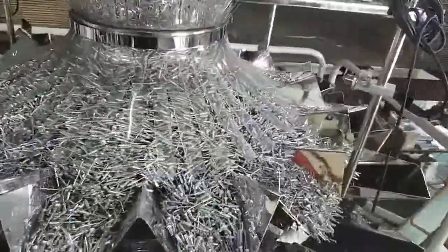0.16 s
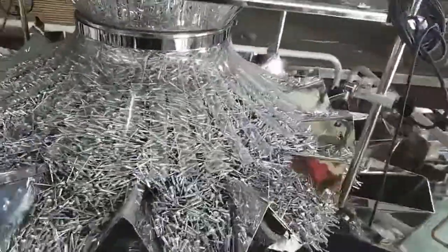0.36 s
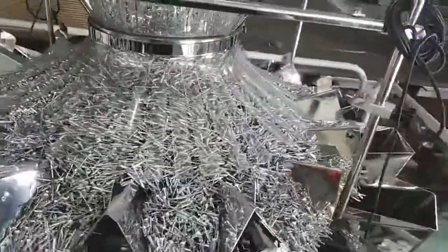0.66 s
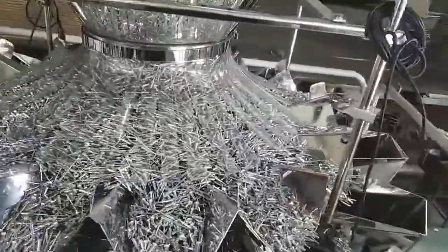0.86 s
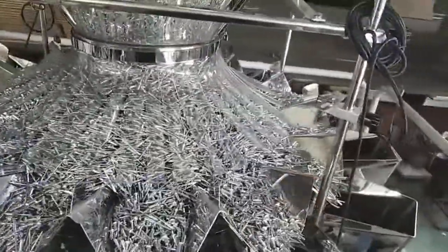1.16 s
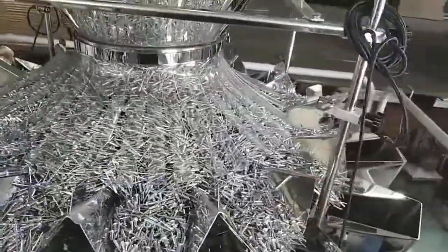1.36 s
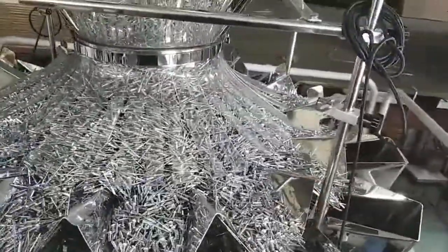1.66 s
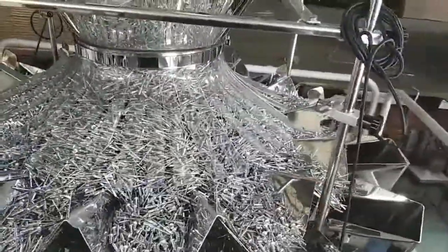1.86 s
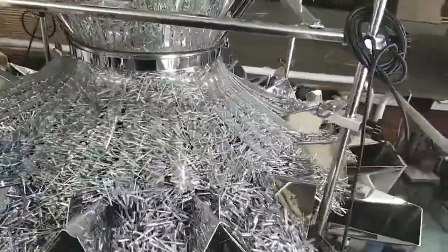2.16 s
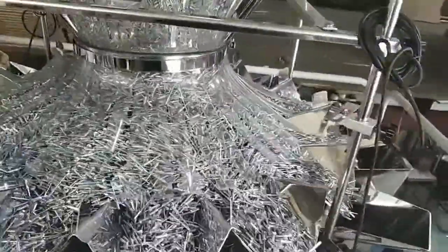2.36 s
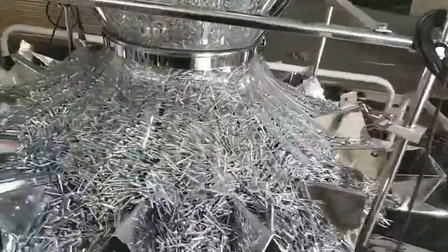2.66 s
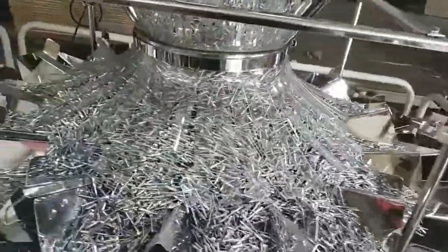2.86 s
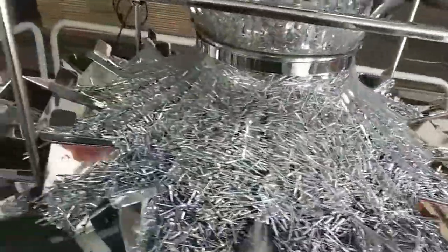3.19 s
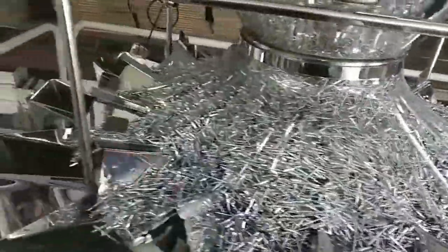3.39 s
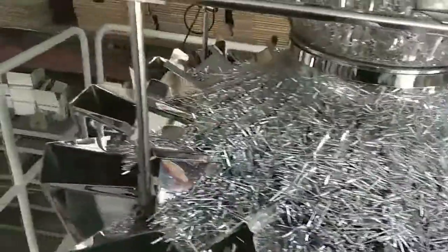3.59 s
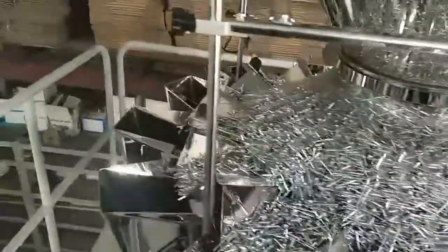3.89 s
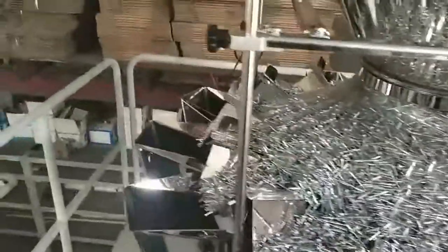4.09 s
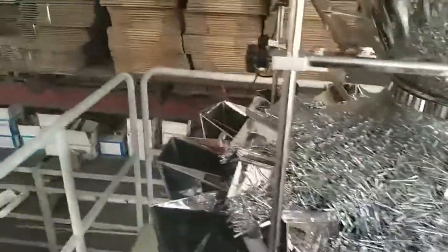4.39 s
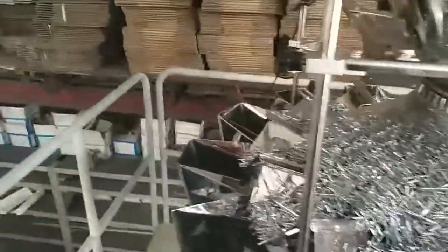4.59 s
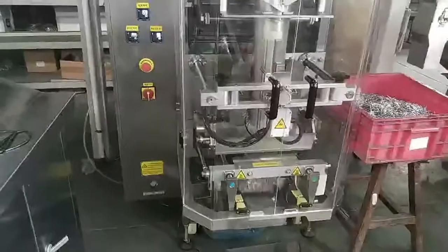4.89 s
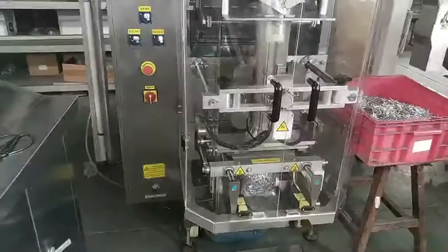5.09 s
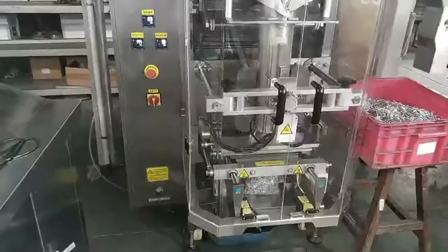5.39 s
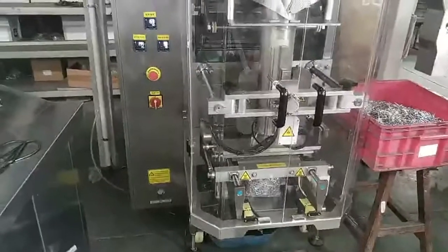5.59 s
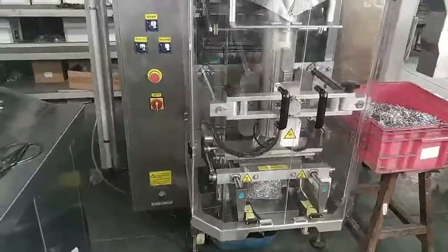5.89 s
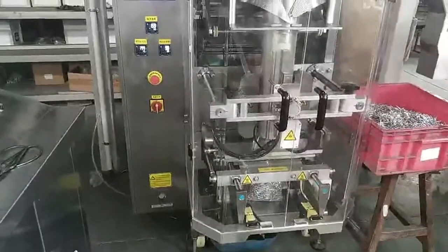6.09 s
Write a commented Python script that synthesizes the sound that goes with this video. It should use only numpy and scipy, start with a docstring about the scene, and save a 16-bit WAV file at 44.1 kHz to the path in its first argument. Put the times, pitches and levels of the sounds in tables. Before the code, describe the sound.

Countless small steel nails jingle and clatter down vibrating metal pans into buckets, with sharp pings and a pouring rush, then a brighter, steadier jingle.

```python
"""In a hall, steel nails shake down the vibrating pans of a weighing machine and drop into its buckets.
From the start, grains ringing at many pitches make the jingle, pan clatter and rumble; soon single nails
ring bucket modes, metal groans through narrow resonances and dry decaying tones tick. Then gate drives
hum in short strokes of resonant noise, and at 2.21 s a batch pours down the chute. From 4.65 s the
microphone stands below, beside the bagging unit, where the jingle and clatter have other colours."""
import sys
import numpy as np
from scipy import signal
from scipy.io import wavfile
from scipy.ndimage import uniform_filter1d

SR = 44100
rng = np.random.default_rng(int(sys.argv[2]) if len(sys.argv) > 2 else 0)


def store_wav(level_fs):
    """Save 16-bit WAV to argv[1]."""
    pcm = np.round(np.clip(np.atleast_2d(level_fs), -1, 1) * 32767)
    wavfile.write(sys.argv[1], SR, pcm.T.astype(np.int16))


N = 275625
MOVE_S = 4.65  # from here the microphone stands below, at the bagging unit
FRAME = 512  # samples in a short-time spectrum


def gain_of(db):
    """Decibels to amplitude."""
    return 10 ** (np.asarray(db) / 20)


def evened(x):
    """Scales to rms 1."""
    return x / np.sqrt(np.mean(abs(x) ** 2) + 1e-20)


def read(points, hz):
    """Reads a table along log frequency."""
    f, value = np.transpose(points)
    return np.interp(np.log(hz + 1), np.log(f + 1), value)


def add(mix, s, sound):
    """Mixes a sound in at s seconds, cut off at the end of the mix."""
    part = mix[round(s * SR):][:len(sound)]
    part += sound[:len(part)]


def resonate(x, hz, width):
    """A resonance of gain 1: shifts the curve hz down to zero, smooths, and shifts back."""
    turn = np.exp(2j * np.pi * np.cumsum(hz * np.ones(len(x))) / SR)
    r = np.exp(-np.pi * width / SR)
    return 2 * (turn * signal.lfilter([1 - r], [1, -r], x / turn)).real


def frames_of(x):
    """Short-time spectrum: frequencies, times, values."""
    return signal.stft(x, SR, nperseg=FRAME, noverlap=FRAME * 3 // 4)


def sound_of(z):
    """Back from the short-time spectrum."""
    return signal.istft(z, SR, nperseg=FRAME, noverlap=FRAME * 3 // 4)[1][..., :N]


def patches(shape, bins, frames):
    """Smooth random field over frequency and time, rms 1."""
    field = rng.standard_normal(shape[::-1]).T
    return evened(uniform_filter1d(uniform_filter1d(field, bins, 0), frames, 1))


def pings(lo_hz, hi_hz, per_s, shortest_t60_s, spread_db, tick, count):
    """Many small blows; each ticks and rings one of count pitches, renewed as the pieces move on."""
    struck = rng.random(N) < per_s / SR
    size = gain_of(spread_db * np.minimum(rng.exponential(1, N), 3.6)) * struck
    size *= rng.choice([-1., 1.], N)
    which, ring = rng.integers(0, count, N), np.zeros(N)
    span = SR // 2  # the pitches are redrawn every half second
    for start in range(0, N, span):
        piece = slice(start, start + span)
        for k, (pitch, longer) in enumerate(rng.random((count, 2))):
            step = 2 * np.pi * (lo_hz + (hi_hz - lo_hz) * (k + pitch) / count) / SR
            t60_s = shortest_t60_s * (1 + 0.65934 * longer)
            r = np.exp(-np.log(1000) / (t60_s * SR))
            blows = np.pad(size[piece] * (which[piece] == k), (0, SR // 10))
            resonator = [np.sin(step) * np.sqrt(1 - r)], [1, -2 * r * np.cos(step), r * r]
            add(ring, start / SR, signal.lfilter(*resonator, blows))
    return evened(evened(ring) + tick * evened(size))


def layer(grains, grain_share, colours, level_db, patchy_db):
    """Near grains over the blur of far ones, coloured before and after the move, at the flow's level."""
    blur = rng.standard_normal(N)
    hz, t, z = frames_of(np.sqrt(grain_share) * grains + np.sqrt(1 - grain_share) * blur)
    above, below = (evened(gain_of(read(c, hz)))[:, None] for c in colours)
    z = z * gain_of(patchy_db * patches(z.shape, bins=6, frames=14))
    sound = sound_of(np.where(t < MOVE_S, above, below) * z)
    moved = np.arange(N) >= MOVE_S * SR
    rms = np.where(moved, sound[moved].std(), sound[~moved].std())
    return sound / rms * gain_of(level_db)


# slow levels, over the pans and then at the bagging unit:
# [t/s, pan clatter level/dB, nail jingle level/dB, rumble level/dB]
FLOW_LEVELS = [(0, -28.5, -22.5, -42.5), (.3, -22, -28, -29), (.8, -23, -21.5, -33.5),
               (1.2, -23, -22.5, -34), (1.6, -20.5, -20.5, -31), (2.1, -24.5, -23.5, -36.5),
               (2.5, -25.5, -20, -39), (3.0, -24, -22.5, -37), (3.17, -25.5, -28.5, -35),
               (3.55, -22.5, -22, -35.5), (3.9, -22, -23, -33.5), (4.1, -22, -22.5, -31.5),
               (4.645, -21.5, -21, -35), (4.655, -25, -19.5, -33), (4.85, -27.5, -16.5, -32.5),
               (5.05, -22, -15.5, -33.5), (5.3, -27, -17, -35), (5.6, -25.5, -18, -36.5),
               (6.25, -24, -19, -37.5)]
# bunches of nails slide off a pan:
# [middle t/s, length/s, rise of pan clatter level/dB, of nail jingle level/dB, of rumble level/dB]
PAN_SURGES = [(0.012, 0.023, 3, 5, 4), (0.135, 0.051, 1.5, 8.5, 1.5), (0.259, 0.061, -1.5, 9, 0.5),
              (0.34, 0.094, -2.5, 6, -5), (0.447, 0.098, 4, 3.5, 2.5), (0.568, 0.088, 1.5, 5.5, -2),
              (1.318, 0.065, 5.5, 1, 5), (1.456, 0.09, -4, 5.5, 1.5), (1.475, 0.056, 7, 0, 1.5),
              (1.817, 0.11, 5, 5.5, 3), (1.96, 0.1, 2.5, 4.5, 2), (2.032, 0.073, 3.5, 1, 7),
              (2.27, 0.36, 4.5, 5, 3), (2.813, 0.053, 2.5, 2.5, 3.5), (3.066, 0.086, -0.5, 5, -5.5),
              (3.271, 0.086, 3, 6, 2.5), (4.04, 0.081, 4.5, 1.5, 2.5), (4.174, 0.074, 2, 7.5, 2),
              (4.401, 0.057, 2.5, 3.5, 8.5), (4.528, 0.081, 1, 4.5, 3), (4.946, 0.024, 1, 1, 6),
              (5.16, 0.19, -1.5, -4, 2.5), (5.872, 0.13, -1, 2, 3), (6.183, 0.13, -3, 3.5, 4)]
# the level dips suddenly and creeps back: [lowest t/s, depth of level/dB, recovery/s]
LEVEL_DIPS = [(.15, 7.5, 0.047), (.6, 5, 0.15), (1.835, 4, 0.079), (2.854, 7.5, 0.021),
              (2.935, 5.5, 0.023), (3.288, 7.5, 0.17), (3.645, 5, 0.16), (4.575, 4.5, 0.055)]
DROP_S = 0.012


def levels_db(t):
    """Slow levels of the three layers, changed by each surge and lowered together by each dip."""
    s, *slow = np.transpose(FLOW_LEVELS)
    out = np.array([np.interp(t, s, level) for level in slow])
    for middle, length, *rise_db in PAN_SURGES:
        out = out + np.outer(rise_db, np.exp(-(2 * (t - middle) / length) ** 2))
    for s, depth_db, recovery in LEVEL_DIPS:
        out = out - np.interp(t, [s - DROP_S, s, s + recovery], [0, depth_db, 0])
    return out


# pan clatter heard over the pans, then from below: [f/Hz, relative level/dB per Hz]
PAN_COLOUR_ABOVE = [(1000, -43), (1900, -10.5), (2400, -2), (3000, -0.5), (3900, -3), (5200, -5),
                    (7000, -24)]
PAN_COLOUR_BELOW = [(1000, -22), (1900, -8), (2800, -2.5), (3500, -1.5), (4700, -2), (6500, -26)]


def pan_clatter(level_db):
    """Sheet-metal pans ring in the middle of the range under many small blows."""
    pans = pings(1506.7, 6000, per_s=1200, shortest_t60_s=0.0637, spread_db=3.0, tick=0.99, count=40)
    return layer(pans, 0.32, (PAN_COLOUR_ABOVE, PAN_COLOUR_BELOW), level_db, patchy_db=0.36)


# nail jingle heard over the pans, then from below: [f/Hz, relative level/dB per Hz]
NAIL_COLOUR_ABOVE = [(3500, -32), (5200, -17), (6000, -9.5), (6900, -7.5), (7800, -3.5), (9000, -4.5),
                     (9900, -10.5), (10300, -17), (11000, -43)]
NAIL_COLOUR_BELOW = [(4600, -22), (5300, -4.5), (5850, -1), (7200, -3.5), (8000, 0.5), (8900, 0),
                     (9900, -7), (10300, -19), (11000, -37)]


def nail_jingle(level_db):
    """Small steel nails knock together and ring in the treble."""
    nails = pings(4000, 11000, per_s=1600, shortest_t60_s=0.06188, spread_db=4.0, tick=0.87, count=50)
    return layer(nails, 0.41, (NAIL_COLOUR_ABOVE, NAIL_COLOUR_BELOW), level_db, patchy_db=0.83)


# slow change of the rumble's bass: [t/s, change of level/dB]
BASS_SWELL = [(0, 4.5), (.95, 6), (1.4, 0.5), (1.8, -22), (2.55, -9), (2.9, 5), (3.9, 8.5), (4.25, -2),
              (4.6, -8), (5.2, 6.5), (6.25, -2)]
BASS_HZ = 215  # the bass lies below this corner


def swell_bass(x):
    """The lowest part of the rumble comes and goes slowly."""
    low = signal.sosfiltfilt(signal.butter(3, BASS_HZ, fs=SR, output="sos"), x)
    change_db = np.interp(np.arange(N) / SR, *np.transpose(BASS_SWELL))
    return x + low * (gain_of(change_db) - 1)


# rumble, the same at both places: [f/Hz, relative level/dB per Hz]
RUMBLE_COLOUR = [(30, -40), (125, -50), (175, -8), (290, -8), (400, -7), (650, -12), (1040, -7.5),
                 (1600, -9.5), (2300, -15), (3500, -53)]


def frame_rumble(level_db):
    """The frame's low pings, mostly blurred into a rumble, with a bass that swells."""
    frame = pings(107.3, 2600, per_s=500, shortest_t60_s=0.09282, spread_db=0.5, tick=0.14, count=20)
    return swell_bass(layer(frame, 0.12, (RUMBLE_COLOUR, RUMBLE_COLOUR), level_db, patchy_db=0.3))


def flow():
    """Clatter of pans, jingle of nails and rumble of the frame rise and fall with the flow."""
    coarse_db = levels_db(np.arange(0, N, 25) / SR)
    clatter_db, jingle_db, rumble_db = np.repeat(coarse_db, 25, axis=1)
    return pan_clatter(clatter_db) + nail_jingle(jingle_db) + frame_rumble(rumble_db)


# single loud nails striking a bucket: [t/s, nominal peak level/dB, extra level/dB of modes above 6 kHz]
NAIL_HITS = [(0.116, -7.5, 12), (0.2195, -6, -8), (0.4176, -14, -25), (0.4275, -9, -25), (0.4445, -10, -23),
             (0.5246, -11, -5), (0.542, -10, -14), (0.567, -14, -16), (1.316, -13, -23), (1.4238, -7, 13),
             (2.797, -11, -15), (2.84, -9, -7), (2.8784, -12.5, -10), (2.952, -14, -17), (3.002, -13, -4),
             (3.0598, -10, -10), (3.234, -12.5, -18), (3.2733, -6.5, -7), (3.3045, -13, 17),
             (3.385, -13, -10), (3.394, -12, -12), (4.396, -14, -22)]
# modes of the bucket: [f/Hz, width/Hz, level/dB before that extra]
BUCKET_MODES = [(900, 810, -33), (2460, 130, -3), (3220, 250, 9.5), (4020, 130, 6), (5620, 1500, -9),
                (8300, 490, 23.5)]
BLOW_T60_S = 0.024


def bucket_hits():
    """A short scratchy blow rings the bucket modes; bright blows favour the high ones."""
    out, t = np.zeros(N), np.arange(SR // 10) / SR
    for s, peak_db, treble_db in NAIL_HITS:
        attack = np.minimum(t / 0.00024, 1)
        blow = rng.standard_normal(len(t)) * gain_of(-60 * t / BLOW_T60_S) * attack
        ring = np.zeros(len(t))
        for hz, width, db in BUCKET_MODES:
            ring += gain_of(db + treble_db * (hz > 6000)) * evened(resonate(blow, hz, width))
        nominal_peak = 2 * np.std(ring[:SR // 200])  # twice the rms of the first 5 ms
        add(out, s, gain_of(peak_db) * ring / nominal_peak)
    return out


FIRM, FIRM_S = 0.8, 0.013  # how far a hum holds its level (0 to 1), judged over this time in s


def steadied(x):
    """Evens out the chance swells of a ringing tone, as rubbing keeps it fed."""
    x = evened(x)
    power = uniform_filter1d(x ** 2, round(FIRM_S * SR))
    return evened(x / (power + .05) ** (FIRM / 2))


def hum(length, modes, edge):
    """Rough force through resonances, each applied twice, faded in and out over the edge share."""
    force = rng.standard_normal(round(length * SR))
    tone = np.zeros(len(force))
    for hz, width, db in modes:
        twice = resonate(resonate(force, hz, width), hz, width)
        tone += gain_of(db) * steadied(twice)
    return evened(tone) * signal.windows.tukey(len(force), edge)


# brief hums and rings of metal: [t/s, length/s, starting f/Hz, width of each pass/Hz, level/dB]
METAL_GROANS = [(0.25, 0.13, 461, 89, -30), (0.404, 0.022, 985, 120, -25), (0.417, 0.073, 1170, 420, -26.5),
                (0.42, 0.038, 3550, 120, -23), (0.42, 0.022, 4400, 120, -24), (1.209, 0.051, 860, 80, -32),
                (1.21, 0.03, 2880, 150, -22.5), (1.372, 0.059, 2160, 30, -28),
                (1.899, 0.034, 2447, 30, -23.5), (2.944, 0.039, 182, 40, -35),
                (3.111, 0.15, 900, 900, -33.5), (3.12, 0.079, 1226, 35.2, -32),
                (3.138, 0.124, 310, 220, -32), (3.935, 0.041, 2940, 150, -22), (3.936, 0.063, 900, 40, -33),
                (4.09, 0.053, 1926, 30, -26.5), (4.505, 0.043, 2810, 300, -23.5),
                (5.09, 0.048, 1290, 700, -32), (5.284, 0.031, 3450, 40, -28.5)]
GROAN_RISE = 0.016  # share of its pitch that a groan climbs


def groans():
    """Rubbed metal sounds through one resonance that climbs slightly."""
    out = np.zeros(N)
    for s, length, hz, width, db in METAL_GROANS:
        climb = hz * np.linspace(1, 1 + GROAN_RISE, round(length * SR))
        add(out, s, gain_of(db) * hum(length, [(climb, width, 0)], edge=0.27))
    return out


# hard dry ticks of steel on steel: [t/s, peak level/dB]
STEEL_TICKS = [(0.546, -10), (2.972, -7.5), (3.0734, -6), (3.2331, -10), (3.273, -9)]
TICK_HZ, TICK_T60_S = 5130, 0.0048


def ticks():
    """Steel on steel: one high tone that dies within milliseconds."""
    out, t = np.zeros(N), np.arange(SR // 10) / SR
    for s, peak_db in STEEL_TICKS:
        add(out, s, gain_of(peak_db - 60 * t / TICK_T60_S) * np.sin(2 * np.pi * TICK_HZ * t))
    return out


# strokes of the gate drive: [t/s, length/s, level/dB before it dies away]
GATE_STROKES = [(1.254, 0.17, -23.5), (3.981, 0.16, -24.5)]
# resonances of drive and gate housing: [f/Hz at full speed, width of each pass/Hz, relative level/dB]
DRIVE_MODES = [(417, 15, -1.5), (540, 290, -5.5), (742, 140, -2)]
SPIN_UP, SPIN_UP_S = 0.14, 0.029  # a stroke starts this share flat and catches up with this time constant
STROKE_FADE_DB = 4.5  # a stroke dies away by this much


def gate_strokes():
    """The gate drive spins up, carrying one shared set of resonances with it, and dies away."""
    out = np.zeros(N)
    for s, length, db in GATE_STROKES:
        speed = 1 - SPIN_UP * np.exp(-np.arange(round(length * SR)) / (SPIN_UP_S * SR))
        modes = [(hz * speed, width, mode_db) for hz, width, mode_db in DRIVE_MODES]
        fade_db = STROKE_FADE_DB * np.linspace(0, 1, len(speed)) ** 2
        add(out, s, hum(length, modes, edge=0.31) * gain_of(db - fade_db))
    return out


# resonances of the chute: [middle f/Hz, width of each pass/Hz, relative level/dB]
CHUTE_MODES = [(1007, 200, -8.5), (1763, 110, -9.5), (3060, 250, -2), (3473, 95, -1), (4270, 120, -2),
               (5220, 54, -8)]
POUR_S, POUR_LENGTH_S, POUR_DB, POUR_FADE_DB = 2.21, 0.7, -20.5, 12.5  # start, length, level, fade


def chute_pour():
    """A batch pours down the chute and rings its resonances, whose pitches sway as it dies away."""
    out = np.zeros(N)
    sway = 1 + 0.0074 * patches((len(CHUTE_MODES), SR), bins=1, frames=2000)
    sway = sway[:, :round(POUR_LENGTH_S * SR)]
    modes = [(hz * drift, width, db) for (hz, width, db), drift in zip(CHUTE_MODES, sway)]
    pour = hum(POUR_LENGTH_S, modes, edge=0.073)
    add(out, POUR_S, pour * gain_of(POUR_DB - POUR_FADE_DB * np.linspace(0, 1, len(pour))))
    return out


# stereo width of the treble: [f/Hz, share of the time it is wide]
TREBLE_WIDTH = [(3800, .0), (5000, 0.022), (6500, 0.27), (8800, 0.6), (9700, 0.26), (10300, .0)]
WIDE_DB = 2.5  # level of the wide treble against the centre


def treble_width(centre):
    """Stereo treble with random phases that spreads between left and right in patches, coming and going."""
    hz, t, z = frames_of(centre)
    scattered = uniform_filter1d(abs(z), 5, 0) * np.exp(2j * np.pi * rng.random(z.shape[::-1]).T)
    field = patches(z.shape, bins=24, frames=14)
    rank = field.argsort(1).argsort(1) / len(t)  # 0 to 1 along time, so a share can be cut off
    wide = np.clip(15 * (read(TREBLE_WIDTH, hz)[:, None] - rank), 0, 1)
    return sound_of(scattered * uniform_filter1d(wide, 3, 1) * gain_of(WIDE_DB))


def scene():
    """One centred sound, with a patchy spread treble added in opposite sign to left and right."""
    strike_band = signal.butter(6, [550, 9800], "band", fs=SR, output="sos")
    strikes = signal.sosfilt(strike_band, bucket_hits() + ticks())
    centre = flow() + strikes + groans() + gate_strokes() + chute_pour()
    side = treble_width(centre)
    return np.array([centre + side, centre - side])


EDGE_HZ = 11200  # upper band limit


def record(dry):
    """The microphone drops the deep bass, the loudest peaks are rounded off; then the band limit."""
    thin = signal.sosfilt(signal.butter(3, 165, "high", fs=SR, output="sos"), dry)
    rounded = thin / (1 + abs(thin) ** 4) ** .25
    band_limit = signal.firwin(511, EDGE_HZ, window=("kaiser", 9), fs=SR)
    return signal.oaconvolve(rounded, band_limit[None], "same")


dry = scene()
out = record(dry)
store_wav(out)
```